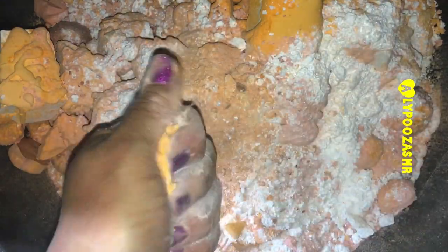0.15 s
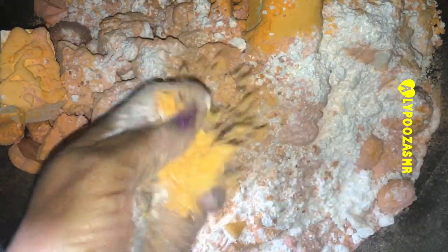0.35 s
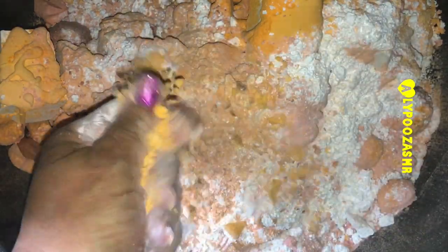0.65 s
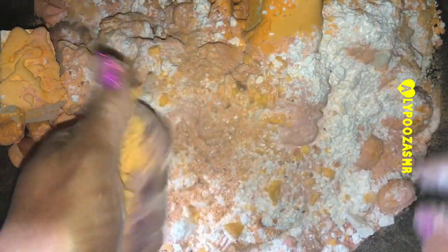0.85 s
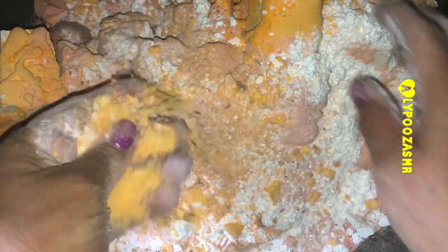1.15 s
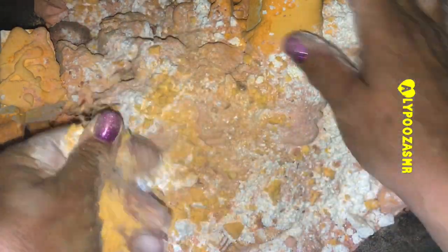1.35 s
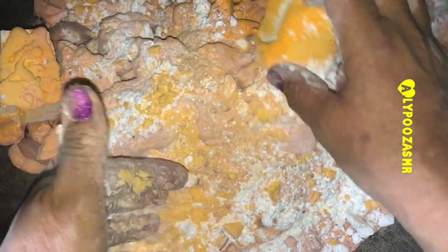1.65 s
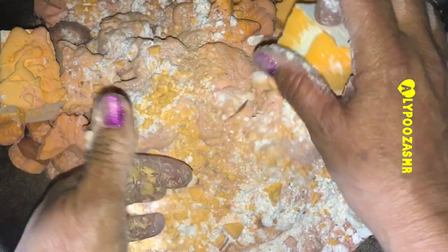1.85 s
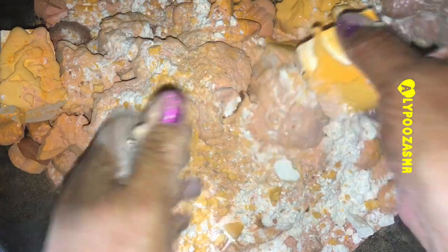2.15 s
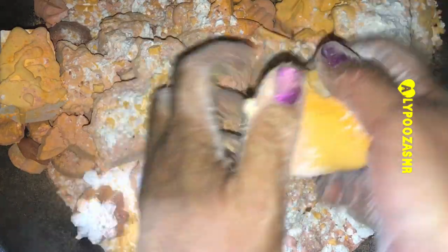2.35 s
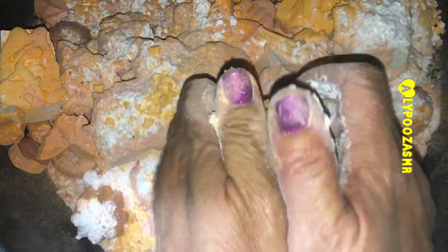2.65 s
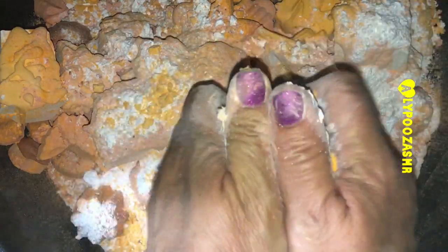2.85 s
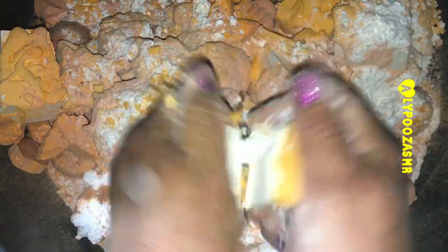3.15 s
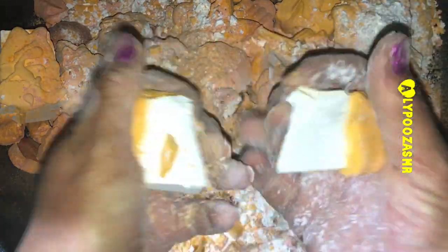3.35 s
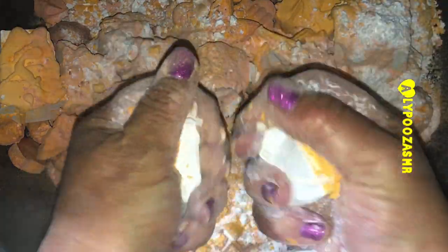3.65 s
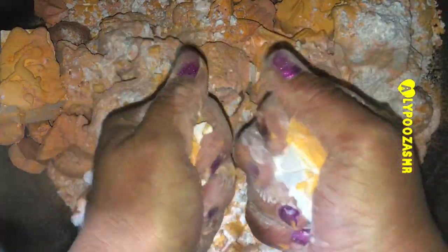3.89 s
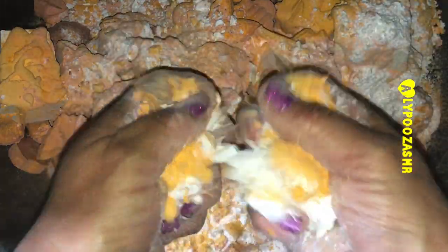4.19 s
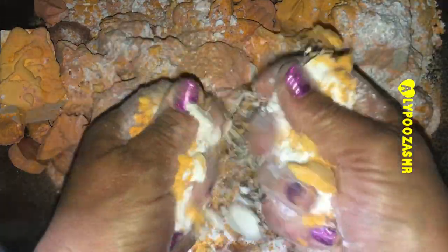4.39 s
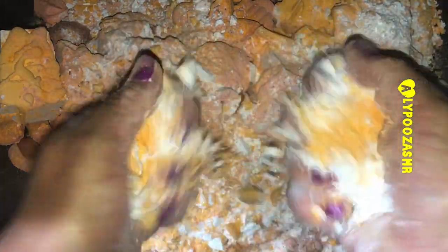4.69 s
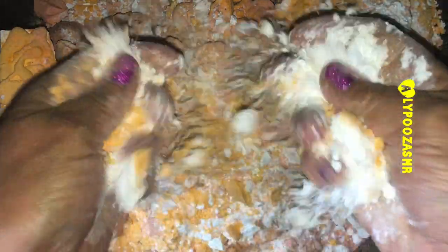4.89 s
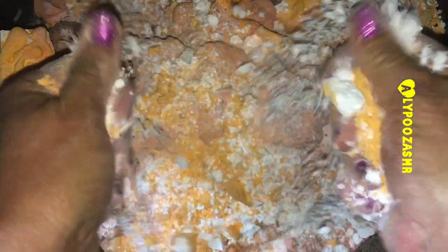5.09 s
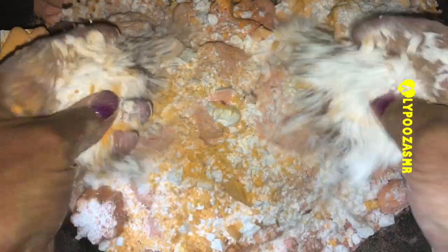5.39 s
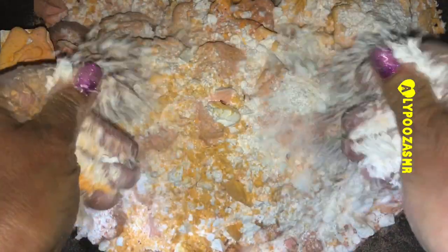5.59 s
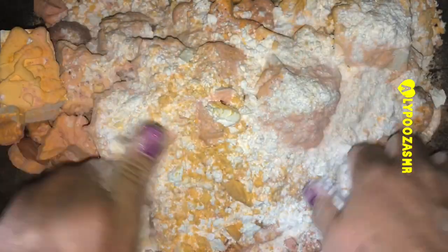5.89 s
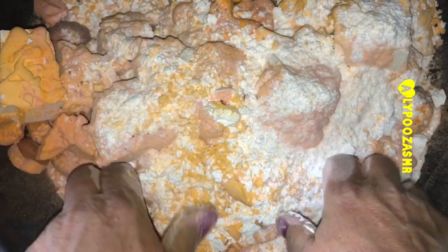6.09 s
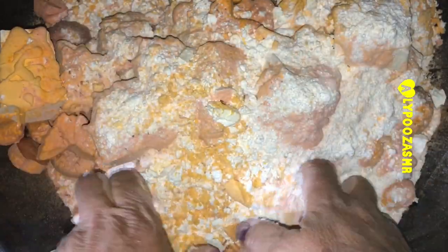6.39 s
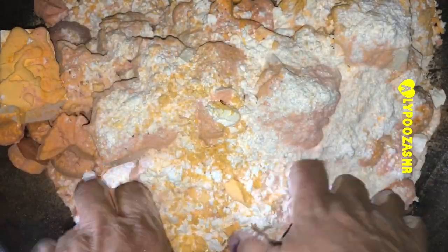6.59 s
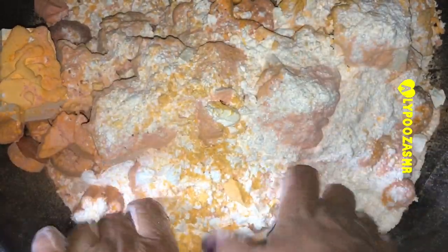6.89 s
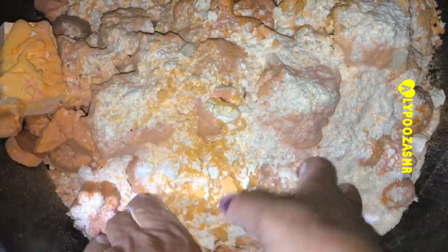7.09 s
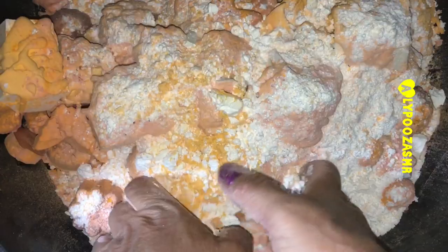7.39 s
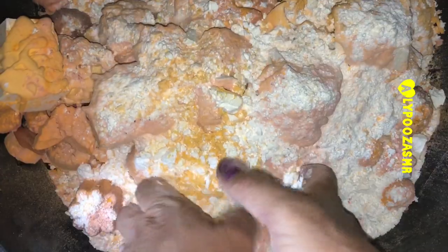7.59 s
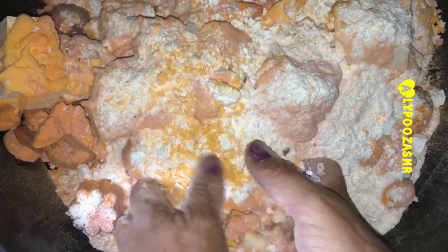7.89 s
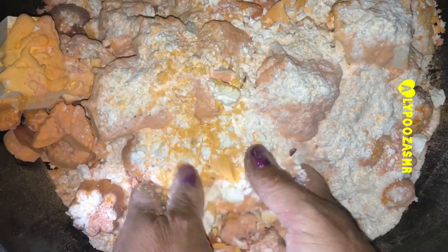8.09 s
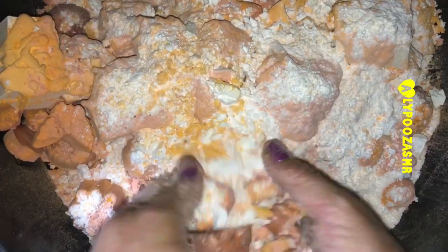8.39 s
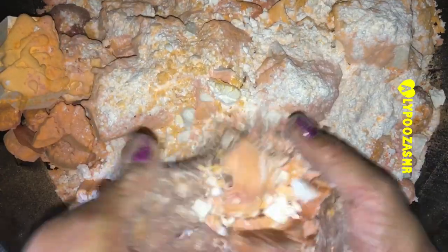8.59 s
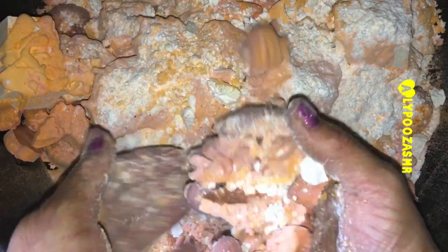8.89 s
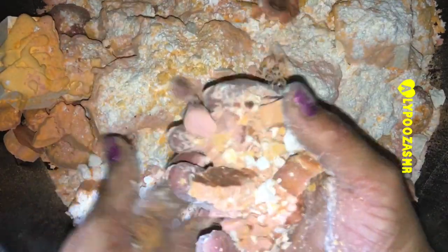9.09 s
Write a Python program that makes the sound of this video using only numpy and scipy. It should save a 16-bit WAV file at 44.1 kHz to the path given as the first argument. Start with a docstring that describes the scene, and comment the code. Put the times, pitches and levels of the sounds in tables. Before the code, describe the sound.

Close, dry chalk crushing in a quiet room with a faint low murmur. From 0 to 1.2 s a closed fist squeezes fine powder: soft bright fizz, tiny grit clicks and pattering crumbs. Around 1.2-1.7 s lumps knock and crunch more strongly, with small cracks to 2.1 s. It thins to faint skin rubs until a sharp crack at 3.0 s. Another lull, then a block snaps at 3.6 s and hardest at 3.8 s, with a short low thud. Crushing resumes from 4.1 s; loud knocks at 4.7, 5.2 and 5.4 s fall amid dense crumb patter. From 6 s hands rake the bed in louder hissing, grinding strokes, rumbling beneath, with a deep thud at 6.8 s and scraping until 8 s. A buried slab rasps dully at 8.2 s, cracks and thuds at 8.45 s, then crumbs and small cracks fade past 9 s.

```python
"""Hands crush blocks of dry gym chalk over a basin of powder: dense fizz of shearing powder and clicks of grit.
Blocks crack with bright ticks and a short ring, crumbs snap and patter, lumps knock and heavy pieces thud.
Skin rubs as bright hiss, fingers plough low through rubble, and a buried slab rasps as it is dragged free.
The packed bed rumbles under the hands, over stirred air and the low murmur of a quiet room.
Everything is shaped noise, random clicks and short decaying sines, close and dry."""
import sys
import numpy as np
from scipy import signal
from scipy.fft import rfft, irfft, next_fast_len
from scipy.io import wavfile

SR = 44100
rng = np.random.default_rng(int(sys.argv[2]) if len(sys.argv) > 2 else 0)


def unload_audio(sound):
    """Save the sound as a 16-bit wav file, at the path given as the first command line argument."""
    columns = np.transpose(np.atleast_2d(sound))
    # keep every value between -1 and 1, then stretch to whole-number steps
    steps = np.round(np.clip(columns, -1, 1) * 32767)
    wavfile.write(sys.argv[1], SR, steps.astype(np.int16))


N = 407925
TIME = np.arange(N) / SR
BLOW = TIME[:SR // 4]  # time since a blow, in seconds


def from_db(db):
    """Decibels to gain."""
    return 10 ** (np.asarray(db) / 20)


def rms_one(x):
    """Scale to unit power."""
    return x / np.sqrt(np.mean(x ** 2) + 1e-20)


def in_time(rows):
    """Each column of a curve, interpolated at every sample."""
    s, *columns = np.transpose(rows)
    return [np.interp(TIME, s, column) for column in columns]


def band(x, low_hz, high_hz, order=2):
    """Causal band-pass."""
    sos = signal.butter(order, [low_hz, high_hz], "band", fs=SR, output="sos")
    return signal.sosfilt(sos, x + 1e-18)


def log_bins(size):
    """Log frequency of each FFT bin, with the lowest held at 1 Hz."""
    return np.log(np.maximum(np.fft.rfftfreq(size, 1 / SR), 1))


def coloured(x, spectrum):
    """Give a white signal a spectrum; rms 1."""
    hz, db = np.transpose(spectrum)
    size = next_fast_len(N)
    curve_db = np.interp(log_bins(size), np.log(hz), db, left=-80, right=-80)
    return rms_one(irfft(rfft(x, size) * from_db(curve_db), size)[:N])


def drift(per_s):
    """Smooth random wandering with spread 1, through per_s random points a second."""
    points = rng.standard_normal(N // 8)
    return np.interp(TIME * per_s, np.arange(N // 8), points) * np.sqrt(3 / 2)


def dying(t60):
    """Envelope that falls 60 dB in t60 seconds."""
    return np.exp(-np.log(1000) * BLOW / t60)


def ring(hz, t60):
    """A decaying sine."""
    return np.sin(2 * np.pi * hz * BLOW) * dying(t60)


def add(out, s, sound):
    """Mix a sound in at a time in seconds."""
    start = round(s * SR)
    out[start:start + len(sound)] += sound[:N - start]


def grains(per_s, spread_db):
    """Random clicks, many small and a few large; their power does not depend on their rate."""
    chance = np.clip(per_s / SR, 1e-4, 1)
    sizes = from_db(spread_db * np.minimum(rng.exponential(1, N), 4)) * rng.choice([-1, 1], N)
    return rms_one(sizes * (rng.random(N) < chance) / np.sqrt(chance))


def burst(t60, tail_db, tail_t60):
    """Uneven micro-breaks that die away quickly over a quieter tail; unit energy."""
    sizes = from_db(3 * np.clip(rng.standard_normal(len(BLOW)), -2, 2))
    fading = dying(t60) + from_db(tail_db) * dying(tail_t60)
    breaks = rng.standard_normal(len(BLOW)) * sizes * fading
    return breaks / np.linalg.norm(breaks)


def effort(strokes, attack_s, tighten_db_per_s, release_s, rest_db):
    """Level in dB of (start, length, dB) strokes: each takes hold, tightens slowly and dies away on release."""
    power = from_db(rest_db) ** 2
    for start, length, db in strokes:
        since = np.maximum(TIME - start, 0)
        release = np.exp(-np.clip((since - length) / release_s, 0, 20))
        grip = np.minimum(since / attack_s, 1) * release
        tighten_db = tighten_db_per_s * (np.minimum(since, length) - length / 2)
        power = power + (grip * from_db(db + tighten_db)) ** 2
    return 10 * np.log10(power)


# Tone of the quiet room. Each row: frequency in Hz, relative level in dB per Hz.
ROOM = [(20, -14), (42, 2.5), (65, -11), (95, -0.5), (135, -10.5), (190, -16), (350, -21), (520, -19.5),
        (850, -37.5), (4000, -68), (8500, -58), (16000, -42.5)]


def room(level_db=-56.5):
    """A steady noise, strongest in the lows, murmurs behind the hands."""
    return from_db(level_db) * coloured(rng.standard_normal(N), ROOM)


# Tone of the stirred air. Each row: frequency in Hz, relative level in dB per Hz.
AIR = [(2, -5), (6, 0), (14, -5.5), (22, -53)]


def air(level_db=-45.5):
    """Air stirred by the hands sways as noise near and below the limit of hearing."""
    return from_db(level_db) * coloured(rng.standard_normal(N), AIR)


# Hands leaning on the bed. Each row: start in seconds, length in seconds, level at mid-press in dB.
PRESSES = [(0.8, 0.72, -55), (1.55, 0.6, -49), (1.73, 0.12, -41.5), (4.48, 0.046, -44.5),
           (4.69, 0.094, -45.5), (5.05, 0.42, -51.5), (5.84, 0.45, -42.5), (6.39, 0.094, -34.5),
           (6.6, 0.14, -35), (6.8, 0.81, -42.5), (7.55, 0.3, -41), (7.9, 0.73, -48), (8.81, 0.26, -46.5)]
# Tone of the packed bed. Each row: frequency in Hz, relative level in dB per Hz.
BED = [(20, 0), (35, 1), (55, 4.5), (80, 4.5), (120, -7.5), (200, -13.5), (600, -44)]


def bed_rumble(lumpy_db=2.5):
    """The packed bed shifts unevenly under the weight of the hands."""
    weight_db = effort(PRESSES, attack_s=0.013, tighten_db_per_s=6.5, release_s=0.063, rest_db=-63.5)
    return from_db(weight_db + lumpy_db * drift(22)) * coloured(rng.standard_normal(N), BED)


# Pull on the buried slab. Each row: time in seconds, level in dB.
DRAG = [(8.1, -83), (8.22, -51.5), (8.41, -57), (8.47, -89)]
# Tone of its dull scrape. Each row: frequency in Hz, relative level in dB per Hz.
SLAB = [(500, 1.5), (900, 1), (1400, -5), (1700, 7), (1950, -48)]


def slab():
    """The buried slab rasps dully in many small slips as it is pulled through the powder."""
    level_db, = in_time(DRAG)
    slips = grains(1500, spread_db=2.5)
    return from_db(level_db) * coloured(slips, SLAB)


# Fingertips in packed rubble. Each row: start in seconds, length in seconds, level at mid-stroke in dB.
PLOUGHS = [(1.59, 0.1, -54), (2.1, 0.11, -55), (6.385, 0.055, -42.5), (6.455, 0.077, -44.5),
           (6.707, 0.041, -42), (7.575, 0.027, -48), (8.39, 0.028, -42)]
# Tone of their low scrape. Each row: frequency in Hz, relative level in dB per Hz.
RUBBLE = [(110, 0), (280, 0.5), (650, -5.5), (1800, -15)]


def ploughs():
    """Packed rubble sticks and slips ahead of the fingertips in a low, uneven scrape."""
    level_db = effort(PLOUGHS, attack_s=0.0068, tighten_db_per_s=4, release_s=0.0091, rest_db=-101)
    slips = grains(600, spread_db=2.0)
    return from_db(level_db) * coloured(slips, RUBBLE)


def hollow(x, hz, echo=.22):
    """Sound bounces inside a cupped hand and rings at multiples of hz; rms 1."""
    feedback = np.r_[1, np.zeros(round(SR / hz) - 1), -echo]
    return rms_one(signal.lfilter([1], feedback, x))


# Powdery skin sliding over chalk. Each row: middle in seconds, length in seconds, level in dB.
RUBS = [(0.305, 0.056, -52), (0.753, 0.075, -50.5), (1.763, 0.039, -47.5), (2.355, 0.047, -53),
        (2.51, 0.15, -57), (2.594, 0.03, -47), (2.723, 0.1, -54), (3.275, 0.067, -54.5),
        (3.437, 0.032, -50), (4.104, 0.1, -54), (5.965, 0.015, -45), (6.105, 0.12, -45.5),
        (6.229, 0.069, -37), (6.512, 0.054, -32), (6.646, 0.033, -36), (6.887, 0.023, -35),
        (7, 0.094, -41.5)]
# Tone of dusty skin. Each row: frequency in Hz, relative level in dB per Hz.
SKIN = [(1000, -20.5), (4900, -16), (5600, -12.5), (7200, -6.5), (8300, -4), (10000, -8.5), (12000, -16.5),
        (16000, -29)]


def rubs(hollow_hz=1400, cupping_db=.5):
    """Each slide of dusty skin swells and fades as a bright hiss, ringing in a hollow of its own steady size."""
    out = np.zeros(N)
    around = np.r_[-BLOW[::-1], BLOW]  # time from the middle of a slide
    hiss = coloured(grains(15000, spread_db=2.0), SKIN)
    for s, length, db in RUBS:
        swell = from_db(db) * np.exp(-np.abs(2 * around / length) ** 3 / 2)
        slide = hiss[round(s * SR):][:len(around)]
        hz = hollow_hz * from_db(cupping_db * rng.standard_normal())
        add(out, s + around[0], swell * hollow(slide, hz))
    return out


# Low rings of heavy pieces landing; rows close together in time are modes of one thud.
# Each row: start in seconds, level of the ring in dB, pitch in Hz, t60 in seconds.
THUDS = [(2.05, -27.5, 177, 0.053), (3.04, -19, 350, 0.0094), (3.609, -26, 292, 0.0099),
         (3.644, -26.5, 218, 0.02), (3.775, -18, 200, 0.061), (3.78, -19.5, 457, 0.044),
         (3.829, -31, 397, 0.083), (4.488, -25.5, 262, 0.031), (4.731, -22, 480, 0.023),
         (5.855, -26.5, 83, 0.15), (5.859, -35.5, 349, 0.12), (6.767, -20.5, 78.5, 0.16),
         (6.767, -17, 164, 0.087), (6.77, -18.5, 284, 0.044), (8.457, -16.5, 283, 0.14),
         (8.831, -27.5, 79.6, 0.12), (8.947, -29, 212, 0.045)]


def thuds(rough_db=-9):
    """A heavy piece rings low and briefly in one or more modes, damped by the powder around it."""
    out = np.zeros(N)
    for s, level_db, hz, t60 in THUDS:
        noise = band(rng.standard_normal(len(BLOW)), hz / 2, hz * 2)
        rough = from_db(rough_db) * rms_one(noise) * dying(t60)
        add(out, s, from_db(level_db) * (ring(hz, t60) + rough))
    return out


# Lumps hitting the bed or each other. Each row: time in seconds before the lag, relative level in dB,
# pitch in Hz.
LUMPS = [(0.413, -32.5, 3760), (0.492, -41.5, 546), (0.867, -38.5, 1070), (1.146, -29, 800),
         (1.223, -26, 1350), (1.265, -28, 1330), (1.348, -23.5, 980), (1.358, -19.5, 1640),
         (1.38, -22.5, 1460), (1.414, -25.5, 2040), (1.668, -25.5, 1500), (1.729, -31.5, 2020),
         (3.825, -20.5, 580), (3.862, -24.5, 580), (4.487, -22.5, 1400), (4.587, -26.5, 1420),
         (4.693, -22.5, 830), (4.724, -7.5, 1026), (4.887, -32.5, 1800), (4.937, -34, 1070),
         (4.947, -25, 2080), (5.019, -28, 2030), (5.053, -32.5, 736), (5.161, -8.5, 1580),
         (5.205, -22, 1510), (5.264, -12.5, 1240), (5.296, -18.5, 1340), (5.31, -24, 610),
         (5.374, -32, 1280), (5.385, -12.5, 1510), (5.488, -28.5, 2530), (5.699, -26.5, 1240),
         (5.755, -21.5, 1390), (5.8505, -22.5, 1510), (5.859, -24, 640), (5.905, -27.5, 1090),
         (6.766, -16.5, 1180), (7.176, -20, 2480), (7.237, -29, 2820), (7.373, -22, 1070),
         (7.785, -21, 2050), (8.401, -37, 840), (8.454, -18, 675), (8.521, -22, 1240), (8.534, -20, 1180),
         (8.571, -24.5, 1180), (8.582, -25, 1290), (8.822, -31, 780), (9.069, -28.5, 1180)]


def lumps(knock_db=1, cycles=12, contact_s=0.001, settle_db=-11, settle_t60=0.024,
          bed_db=-25, bed_t60=0.091, lag_s=.0007, chip_db=-19):
    """A lump chips with a dry snap, gives a dead knock, settles with a short rattle and stirs the bed."""
    out = np.zeros(N)
    contact = (1 - dying(contact_s)) ** 2  # powder cushions the touch
    for s, level_db, hz in LUMPS:
        noise = rng.standard_normal((2, len(BLOW)))
        knock = ring(hz, cycles / hz)
        rattle = band(noise[0], hz / 2, hz * 2, order=3)
        settle = from_db(settle_db) * rms_one(rattle) * dying(settle_t60)
        bed = from_db(bed_db) * rms_one(band(noise[1], 210, 900)) * dying(bed_t60)
        chip = band(burst(.005, -24, .025), 900, 5000)
        snap = from_db(min(level_db + 8.5, chip_db)) * chip  # the snap stops growing with size
        add(out, s + lag_s, from_db(level_db + knock_db) * contact * (knock + settle + bed) + snap)
    return out


def crumbs(level_db, per_s, count=8):
    """Loose crumbs patter in little flurries, each a dry tick of a brightness dealt at random."""
    born = rng.random(N) < per_s * from_db(3 * drift(9)) / SR
    sizes = born * from_db(level_db + 5 * np.minimum(rng.exponential(1, N), 2))
    dealt = rng.integers(0, count, N)
    ticks = 0
    for k, hz in enumerate(np.geomspace(900, 7500, count)):
        rattle = band(burst(.005, -26, .02), hz / 2, hz * 2, order=1)
        ticks = ticks + signal.oaconvolve(sizes * (dealt == k), rattle)[:N]
    return band(ticks, 280, 10000)


# Crumbs breaking away. Each row: time in seconds, mean crumbs per second before the flurries,
# base level in dB above the fine powder.
SHEDDING = [(0, 55, 20), (.8, 45, 23), (2.15, 60, 28), (2.4, 4, 25), (4, 6, 25), (4.7, 60, 27),
            (5.4, 55, 27), (6, 15, 22), (9.25, 25, 22)]


def shedding(fine_db, largest_db=-23):
    """Harder work sheds larger crumbs, up to a base level."""
    per_s, above_db = in_time(SHEDDING)
    return crumbs(np.minimum(fine_db + above_db, largest_db), per_s)


# The loudest single crumbs. Each row: time in seconds, relative peak level in dB.
CRUMBS = [(0.202, -32), (2.785, -40), (2.9825, -34), (4.3525, -26), (4.39, -30), (4.748, -31), (5.039, -30),
          (5.055, -28), (5.22, -28), (5.279, -31), (5.331, -26), (5.469, -27), (8.4725, -21.5),
          (8.869, -31), (8.9485, -33.5), (9.0575, -32)]


def snaps(snap_db=-2, t60=0.0087, centre_hz=4300):
    """A single crumb snaps off with a crisp tick, each of its own brightness."""
    out = np.zeros(N)
    for s, peak_db in CRUMBS:
        hz = centre_hz * from_db(rng.standard_normal())
        tick = band(burst(t60, -22, .02), hz / 3, hz * 2)
        add(out, s, from_db(peak_db + snap_db) * tick / np.abs(tick).max())
    return out


# Chalk cracking. Each row: time in seconds before the lag, relative level of the bright tick in dB,
# relative level of the block's body in dB, crumbling t60 in seconds.
FRACTURES = [(0.887, -31, -43, 0.012), (1.1453, -26.5, -45, 0.022), (1.4302, -21.5, -29.5, 0.0088),
             (1.952, -26.5, -50, 0.03), (2.0478, -25.5, -38, 0.014), (2.806, -28.5, -65, 0.022),
             (3.029, -21.5, -46, 0.02), (3.04, -14.5, -25, 0.033), (3.49, -27, -61, 0.027),
             (3.646, -18.5, -29.5, 0.025), (3.696, -21, -25.5, 0.029), (3.7765, -10.5, -4, 0.023),
             (3.7898, -16.5, -26, 0.0082), (3.822, -17, -26, 0.0081), (3.8265, -17, -16.5, 0.018),
             (3.8659, -24, -24, 0.011), (4.487, -15, -38, 0.0053), (4.731, -20.5, -29, 0.0048),
             (4.789, -24.5, -26.5, 0.0057), (5.008, -24.5, -43, 0.0081), (5.2043, -21, -47, 0.01),
             (5.2328, -22, -33, 0.0068), (5.3112, -22.5, -27, 0.0058), (5.5162, -17, -31, 0.0089),
             (6.763, -27, -39, 0.0057), (8.4529, -17.5, -17.5, 0.0057), (8.556, -22, -36, 0.0041),
             (9.157, -20, -60, 0.0074)]
# Ring of a breaking block. Each row: pitch in Hz, relative level in dB, t60 in seconds.
BLOCK = [(917, -17, 0.018), (1450, -9.5, 0.014), (2030, 5.5, 0.002)]


def fractures(tick_db=10, body_db=11, dust_db=-22, dust_t60=0.019, lag_s=0.001042, onset_db=-8):
    """A crack opens with a sharp tick, jolts the block, runs on as micro-breaks and sheds a little dust."""
    out = np.zeros(N)
    jolt = band(sum(from_db(db) * ring(hz, t60) for hz, db, t60 in BLOCK), 290, 4500)
    for s, bright_db, block_db, crumbling_s in FRACTURES:
        onset = from_db(onset_db) * (BLOW == 0)  # a single click
        breaks = burst(crumbling_s, dust_db, dust_t60) + onset
        tick = band(band(breaks, 1500, 16000, order=1), 960, 9700, order=5)
        crumbling = band(burst(crumbling_s, dust_db, dust_t60), 290, 2140)
        body = jolt + from_db(body_db) * crumbling
        add(out, s + lag_s, from_db(bright_db + tick_db) * tick + from_db(block_db) * body)
    return out


# Tone of coarse grit. Each row: frequency in Hz, relative level in dB per Hz.
GRIT = [(130, 11.5), (220, 4), (290, 6.5), (420, 0), (580, 4), (760, 1), (1100, 3), (1600, -1.5),
        (2400, -3.5), (3500, -9), (6000, -12)]


def grit(level_db, quiet_per_s=80, quiet_db=-58.5, crowding=1.25, count=7):
    """Crumbs of several sizes click at their own pitches; harder work merges them into a scrape."""
    per_s = quiet_per_s * from_db(crowding * (level_db - quiet_db))
    clicks = 0
    for hz in np.geomspace(190, 4500, count):
        clicks = clicks + band(grains(per_s, spread_db=4.0), hz / 1.3, hz * 1.74)
    return from_db(level_db) * coloured(clicks, GRIT)


# Tone of fine powder. Each row: frequency in Hz, relative level in dB per Hz.
POWDER = [(700, -8), (1700, -2), (2900, 0.5), (4200, -2.5), (5000, -1.5), (6500, 0.9), (8300, 2.5),
          (10000, -1.4), (12000, -9.5), (16000, -26)]


def powder(level_db, fine_per_s=9000, tick_per_s=180, tick_db=-11, clump_db=1.38, fist_db=-4, fist_opens_s=1.0):
    """Fine powder shears in a dense fizz, with sparse ticks of tiny bonds giving way."""
    ticks = from_db(tick_db) * grains(tick_per_s, spread_db=2.0)
    fizz = coloured(grains(fine_per_s, spread_db=1.5) + ticks, POWDER)
    # until it opens, the closed fist brightens the fizz inside it
    fist = from_db(fist_db) * (TIME < fist_opens_s) * band(fizz, 5500, 11000, order=1)
    return from_db(level_db + clump_db * drift(70)) * (fizz + fist)


def shifting(x, patchy_db, per_s, count=14):
    """The contact keeps changing, so each narrow band swells and fades on its own."""
    size = next_fast_len(N)
    bins, spectrum = log_bins(size), rfft(x, size)
    centres = np.log(np.geomspace(400, 13000, count))
    out = 0
    for share in np.eye(count):  # overlapping triangular bands
        part = irfft(spectrum * np.interp(bins, centres, share), size)[:N]
        out = out + part * from_db(patchy_db * drift(per_s))
    return out


def avalanches(per_s, t60=0.069, share=0.45):
    """Gain of a bed that gives way in tiny collapses, each sudden and dying fast; mean power 1."""
    starts = (rng.random(N) < per_s / SR) * rng.exponential(1, N) / per_s
    power = signal.oaconvolve(starts, dying(t60) ** 2)[:N]
    return np.sqrt(1 - share + share * power / power.mean())


# Fingers squeezing or raking the chalk. Each row: start in seconds, length in seconds,
# relative level of fine powder in dB, relative level of coarse grit in dB.
SQUEEZES = [(0.055, 0.15, -57.5, -59), (0.176, 0.03, -54.5, -56), (0.256, 0.088, -60, -67),
            (0.39, 0.16, -60.5, -59.5), (0.555, 0.22, -58, -59.5), (0.821, 0.076, -59, -50),
            (1.021, 0.25, -61.5, -55), (1.2, 0.16, -60, -55.5), (1.306, 0.11, -49.5, -46.5),
            (1.434, 0.14, -61.5, -63.5), (1.542, 0.13, -50, -50.5), (1.688, 0.35, -55, -58),
            (2.074, 0.083, -53.5, -55), (2.22, 0.18, -62, -74.5), (2.708, 0.17, -64.5, -85),
            (3.023, 0.04, -47.5, -49), (3.198, 0.39, -61.5, -72), (3.623, 0.074, -50.5, -46),
            (3.768, 0.075, -50, -44), (3.858, 0.057, -61, -54), (4.077, 0.082, -51, -59.5),
            (4.18, 0.15, -58, -66.5), (4.293, 0.21, -53.5, -57), (4.432, 0.25, -54.5, -56),
            (4.65, 0.12, -50, -45.5), (4.809, 0.43, -55, -52), (5.175, 0.24, -52, -53),
            (5.412, 0.29, -55.5, -59.5), (5.714, 0.084, -53.5, -50.5), (5.839, 0.04, -57.5, -40.5),
            (5.951, 0.36, -52, -52), (6.162, 0.097, -43.5, -44.5), (6.296, 0.27, -43.5, -45.5),
            (6.599, 0.046, -46, -37.5), (6.681, 0.21, -51.5, -47.5), (6.813, 0.32, -41.5, -40.5),
            (7.124, .11, -44.5, -38), (7.284, 0.11, -41, -37), (7.416, 0.17, -42.5, -41),
            (7.524, 0.11, -48.5, -37.5), (7.633, 0.13, -45.5, -41), (7.759, 0.073, -42, -38),
            (7.855, 0.25, -48.5, -43.5), (8.101, 0.23, -53.5, -50.5), (8.34, 0.082, -51.5, -47.5),
            (8.472, 0.12, -50.5, -43), (8.584, 0.074, -52.5, -55.5), (8.675, 0.17, -53, -58),
            (8.907, 0.032, -53, -50.5), (8.984, 0.24, -57.5, -56)]


def squeezes():
    """Levels in dB of powder and grit; the grit takes hold and lets go sooner than the powder."""
    start, length, fine_db, coarse_db = np.transpose(SQUEEZES)
    fine = effort(zip(start, length, fine_db), attack_s=0.04, tighten_db_per_s=3, release_s=0.049, rest_db=-70.0)
    coarse = effort(zip(start, length, coarse_db), attack_s=0.034, tighten_db_per_s=1.5,
                    release_s=0.032, rest_db=-78.0)
    return fine, coarse


def crunch(fine, coarse, powder_db=-0.63, grit_db=-0.39, collapses_per_s=190):
    """Powder, grit and skin share one patchy contact that gives way in tiny collapses."""
    # harder work brings the tiny collapses closer together
    giving = avalanches(collapses_per_s * from_db((fine - fine.mean()) / 2))
    contact = powder(fine + powder_db) + grit(coarse + grit_db) + rubs()
    return giving * shifting(contact, patchy_db=1.51, per_s=35)


def scene():
    """Each squeeze shears powder and grinds grit; cracks, blows and patter join it over a quiet room."""
    fine, coarse = squeezes()
    background = room() + air() + bed_rumble()
    scrapes = slab() + ploughs()
    blows = thuds() + lumps() + fractures()
    patter = shedding(fine) + snaps()
    return (background + scrapes + blows + patter + crunch(fine, coarse))[None]


def record(dry):
    """The top is cut steeply above 16 kHz."""
    return signal.sosfilt(signal.ellip(10, .1, 70, 16000, fs=SR, output="sos"), dry)


dry = scene()
out = record(dry)
unload_audio(out)
```